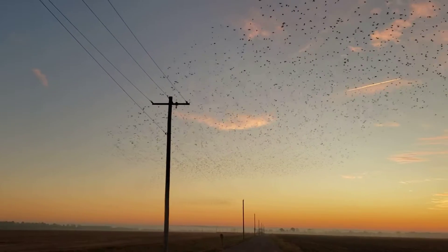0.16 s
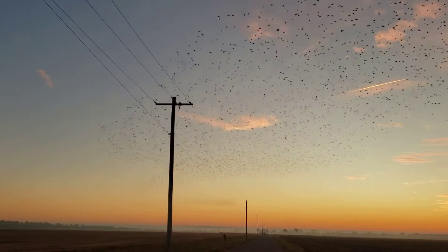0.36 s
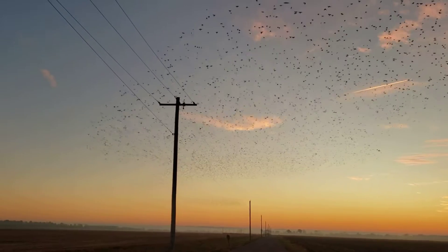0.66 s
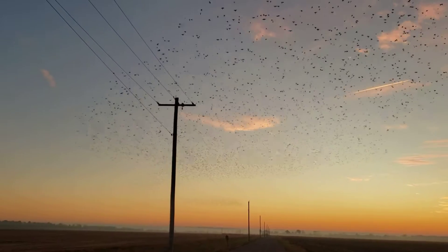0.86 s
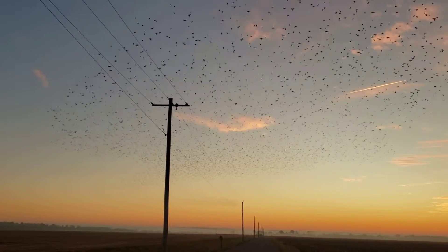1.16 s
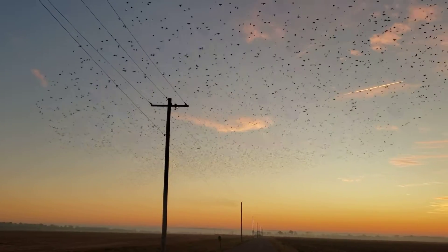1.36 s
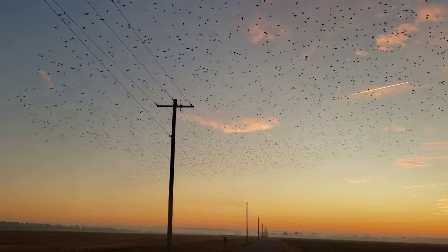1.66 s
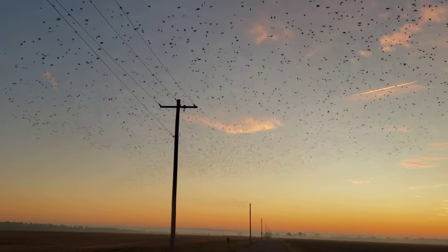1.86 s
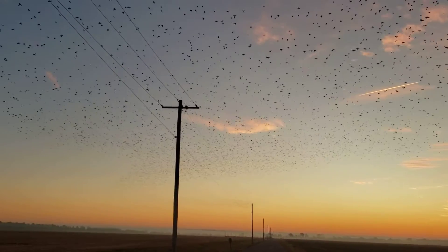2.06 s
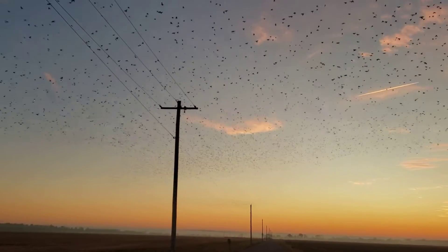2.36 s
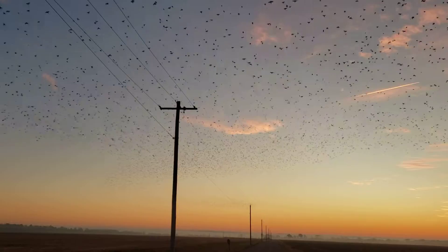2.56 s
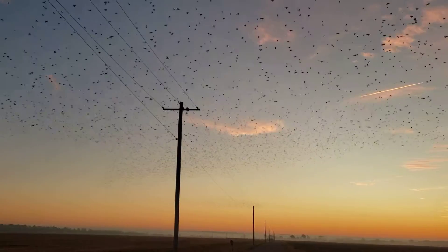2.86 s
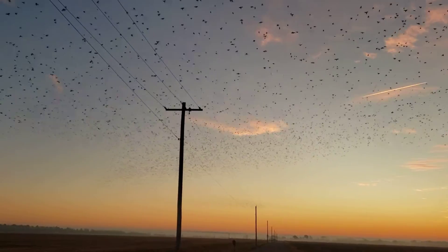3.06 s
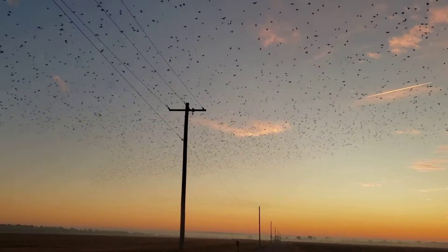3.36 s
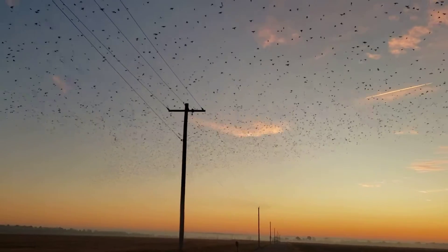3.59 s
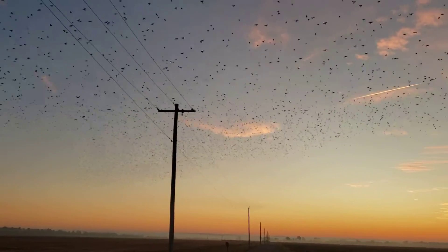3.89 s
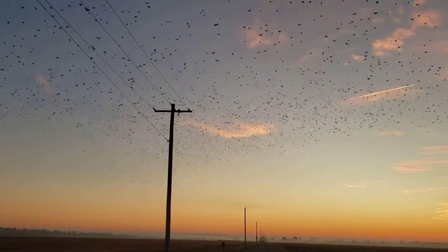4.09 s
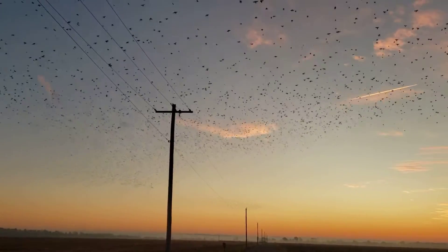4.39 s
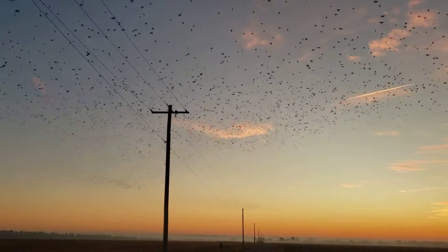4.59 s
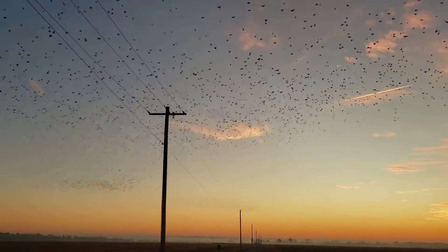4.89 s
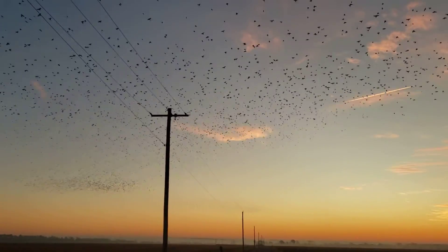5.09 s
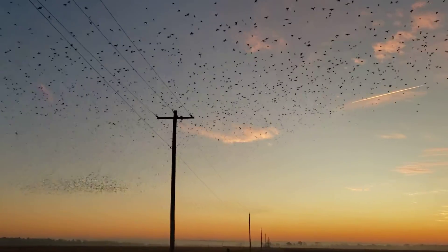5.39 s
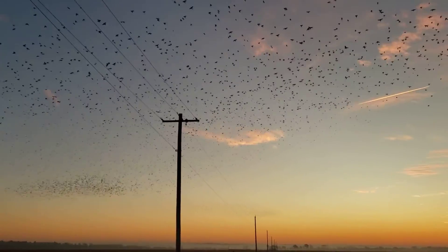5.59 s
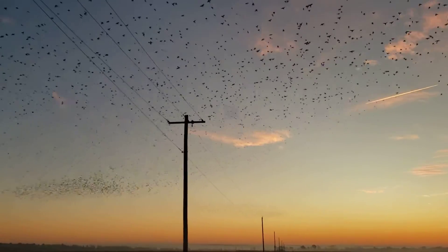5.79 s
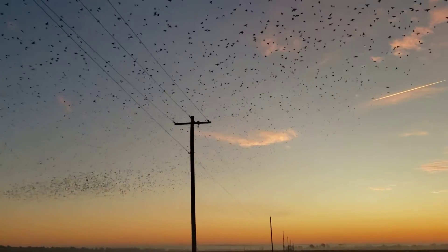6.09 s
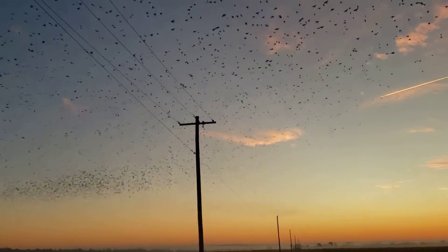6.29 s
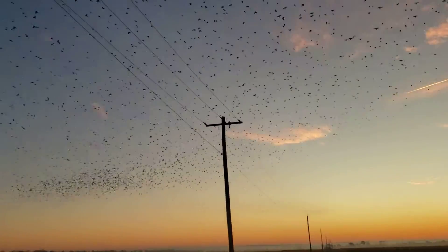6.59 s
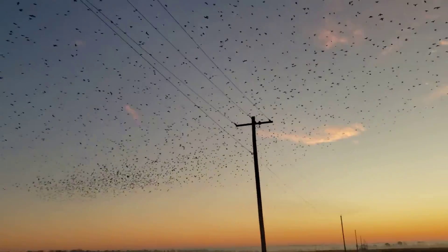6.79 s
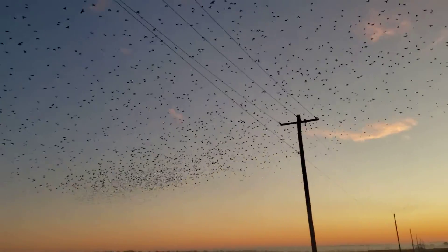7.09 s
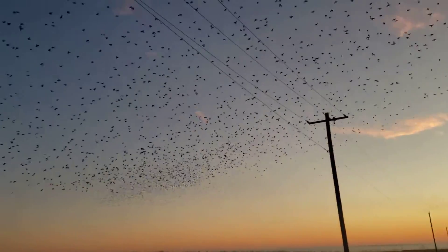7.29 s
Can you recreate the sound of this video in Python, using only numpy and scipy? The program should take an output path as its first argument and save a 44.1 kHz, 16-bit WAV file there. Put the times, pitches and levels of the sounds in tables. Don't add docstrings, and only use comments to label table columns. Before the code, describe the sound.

Dense airy rush of countless wings and flickering bird chatter, near rasps and squeaks poking through, above a very faint low hum and soft wind.

```python
import sys
import numpy as np
from scipy import signal
from scipy.fft import rfft, irfft, next_fast_len
from scipy.io import wavfile
from scipy.ndimage import uniform_filter1d, map_coordinates

SR = 44100
rng = np.random.default_rng(int(sys.argv[2]) if len(sys.argv) > 2 else 0)


def transcribe(signal):
    frames = np.atleast_2d(signal).T
    limited = np.clip(frames, -1, 1)
    pcm = np.round(limited * 32767).astype(np.int16)
    wavfile.write(sys.argv[1], SR, pcm)


def gain_from_db(level_db):
    decades = np.asarray(level_db, float) / 20
    return 10 ** decades


N = 328545

# time in seconds, density in dB, nearness in dB.
STREAM = [(0.0, -35.5, -1.1), (0.6, -35, -1.3), (1.25, -35, -1), (2.3, -35, -0.5), (2.6, -34.5, -0.4),
          (3.3, -35, 0.7), (3.95, -34, 0.5), (4.7, -34.9, 0.9), (5.1, -34.0, 0.2), (5.6, -35.4, 0.9),
          (6.33, -36.0, 0.8), (6.5, -38, -0.3), (6.65, -38.5, -1.0), (7.0, -39, -0.6), (7.45, -38.5, -0.4)]
# frequency in Hz, level in dB per Hz.
FACING_PORT = [(500, -19), (1000, -12), (1300, -6.5), (2000, -2), (2600, -2.5), (3200, 0.0), (3750, -1.5),
               (4300, -6), (5300, -10.5), (6600, -7), (7400, -17.5), (8500, -34), (11800, -26.5),
               (15600, -34.5)]
# frequency in Hz, level in dB per Hz.
SHADED_PORT = [(350.0, -16), (600.0, -6.5), (1000.0, -3.5), (1400.0, 1), (2400.0, -0.5), (3300.0, 0.5),
               (4200.0, -5), (5500.0, -15.5), (6300.0, -15), (7000.0, -20.5), (8800.0, -24.5),
               (11200.0, -17), (12600.0, -23), (14300.0, -38)]
GROUND_PAN_DB = 6


def unit(x):
    return x / np.sqrt(np.mean(x ** 2, axis=-1, keepdims=True) + 1e-20)


def along(points, hz):
    f, v = np.transpose(points)
    return np.interp(np.log(hz + 1), np.log(f + 1), v)


def curves(rows, t):
    s, *cols = np.transpose(rows)
    return [np.interp(t, s, c) for c in cols]


def wobble(rate):
    knots = rng.standard_normal(int(N * rate / SR) + 4)
    return map_coordinates(knots, [np.arange(N) * rate / SR])


def panned(x, db):
    return x * gain_from_db([[db / 2], [-db / 2]])


def paired(a, b, alike):
    turn = np.arccos(np.clip(alike, 0, 1)) / 2
    shared, apart = a * np.cos(turn), b * np.sin(turn)
    return np.array([shared + apart, shared - apart])


def air(spectrum, alike):
    m = next_fast_len(N)
    hz = np.fft.rfftfreq(m, 1 / SR)
    a, b = rfft(rng.standard_normal((2, m))) * gain_from_db(along(spectrum, hz))
    return unit(irfft(paired(a, b, along(alike, hz)), m)[:, :N])


def fields():
    # frequency in Hz, rms level in dB.
    orders = [(79.42, -52.5), (259, -76.5)]
    # frequency in Hz, level in dB per Hz.
    plain_colour = [(60, -14), (88, 2), (110, 0), (150, -1.5), (200, -7.5), (260, -6.5), (330, -11),
                    (500, -6), (700, -18.5), (1000, -39.5)]
    # time in seconds, level in dB.
    plain_level = [(0, -59), (1.1, -62), (1.9, -60.5), (2.6, -59), (2.85, -63), (3.65, -62), (4.2, -58),
                   (4.7, -61), (7.0, -62), (7.45, -59.5)]
    # frequency in Hz, level in dB per Hz.
    wind_colour = [(15, -30), (30, -13), (50, 2.5), (70, 3.5), (95, -30)]
    # peak time in seconds, build-up in seconds, lift in dB.
    gusts = [
        (.7, .4, 5),
        (2.45, 1.0, 9.5),
        (5.8, .2, 3),
        (7.2, .8, 5),
    ]
    calm_db, drop_s = -68.5, .25
    t = np.arange(N) / SR
    hum = 0
    for hz, db in orders:
        strength = gain_from_db(db + 3.5 + 0.57 * wobble(2.95))
        hum = hum + strength * np.sin(2 * np.pi * hz * t + .08 * wobble(4))
    rumble = gain_from_db(curves(plain_level, t)[0] + 2.5) * air(plain_colour, [(100, 0.99), (300, 0.73), (700, 0.87)])
    gust_db = sum(db * np.exp(-((t - s) / np.where(t < s, build, drop_s)) ** 2) for s, build, db in gusts)
    breeze = gain_from_db(calm_db + gust_db + 6.0 + 1.5 * wobble(5.2)) * air(wind_colour, [(30, .05), (70, .7)])
    return panned(hum + rumble + breeze, GROUND_PAN_DB)


def booms():
    # start in seconds, peak level in dB, pitch factor.
    blasts = [
        (4.0325, -45, 2.1),
        (4.186, -38.5, 1.07),
        (5.136, -35.5, 1.1),
        (6.549, -34, 1.05),
    ]
    out, t = np.zeros(N + SR), np.arange(round(.03 * SR)) / SR

    def swing(hz, fall, peak_s):
        swell = (t / peak_s * np.exp(1 - t / peak_s)) ** 1.4
        return np.sin(2 * np.pi * hz * t / (1 + fall * t)) * swell

    def place(s, pulse):
        out[round(s * SR):][:len(t)] += pulse

    for s, db, pitch in blasts:
        place(s, gain_from_db(db) * swing(192 * pitch, 19, .005 / pitch))
        place(s + .031, -gain_from_db(db - 1.0) * swing(510, 40, 0.0009))
        place(s + .0365, -gain_from_db(db - 12.5) * swing(146, 30, .004))
    return panned(out[:N], GROUND_PAN_DB)


def tick():
    click = (4.007, -43)
    start_s, peak_db = click
    out, t = np.zeros((2, N)), np.arange(200) / SR
    scrape = gain_from_db(peak_db - 60 * t / .003) * np.diff(rng.standard_normal(len(t) + 1))
    out[:, round(start_s * SR):][:, :len(t)] = scrape * gain_from_db([[-3], [0]])
    return out


def chirps(rows, rasp_db):
    out = np.zeros((2, N + SR))
    for s, length, start_hz, end_hz, db, pan_db in rows:
        u = np.linspace(0, 1, round((length + 0.0063) * SR))
        drift = np.cumsum(rng.standard_normal(len(u))) * .015 * start_hz / 4000
        hz = start_hz + (end_hz - start_hz) * u
        tone = np.sin(2 * np.pi * np.cumsum(hz) / SR + drift)
        flutter = np.interp(u * length, np.arange(40) * .006, rng.standard_normal(40))
        shape = np.abs(np.sin(np.pi * u)) ** 0.67 * gain_from_db(rasp_db * flutter)
        call = gain_from_db(db + 3.5) * shape * tone * gain_from_db([[0], [-pan_db]])
        out[:, round(max(s - .003, 0) * SR):][:, :len(u)] += call
    return out[:, :N]


def chatter(count=960):
    when, long, pitch, glide, size, side = rng.random((count, 6)).T
    gang_time, gang_pitch = rng.random((count // 8, 2)).repeat(8, axis=0).T
    s = np.clip(gang_time * N / SR + .45 * (when - .5), 0, N / SR)
    hz = 2500 * 2 ** (1.3 * gang_pitch ** 1.2 + .45 * pitch)
    db = curves(STREAM, s)[0] - 1.8 + along(FACING_PORT, hz) - 9 * size
    pan_db = along(FACING_PORT, hz) - along(SHADED_PORT, hz) + 12 + 9 * side
    return chirps(zip(s, .01 + .03 * long, hz, hz * (.97 + .07 * glide), db, pan_db), rasp_db=3.0)


def chacks(length=.05, width_hz=1100):
    # middle of the call in seconds, level in dB, throat resonance in Hz.
    harsh_calls = [(0.14, -29.0, 3390.0), (0.287, -28, 3220.0), (0.573, -28, 3370.0), (.72, -31, 3300),
                   (0.84, -27, 3400.0), (.99, -32, 3200), (1.244, -29, 3100), (1.466, -33, 3260.0),
                   (1.798, -28, 2840), (1.89, -32, 3350), (2.602, -31, 3150.0), (2.844, -29, 3380.0),
                   (3.092, -29, 3590.0), (3.934, -28, 3150.0), (4.33, -31, 3730), (4.41, -31, 3190.0),
                   (4.86, -32, 3200), (5.07, -29, 3200), (5.561, -31, 3220.0), (6.27, -30, 3130.0),
                   (6.392, -36, 3850.0), (6.8, -29, 3300), (6.92, -35, 3400), (7.13, -32, 3200),
                   (7.306, -34.0, 3200)]
    out, u = np.zeros(N + SR), np.linspace(0, 1, round(length * SR))
    for s, db, hz in harsh_calls:
        b, a = signal.butter(2, [hz - width_hz / 2, hz + width_hz / 2], "band", fs=SR)
        rasp = unit(signal.lfilter(b, a, rng.standard_normal(len(u))))
        out[round((s - length / 2) * SR):][:len(u)] += gain_from_db(db - 0.9) * np.sin(np.pi * u) ** 2 * rasp
    return out[:N] * gain_from_db([[0], [-19]])


def whistles():
    # start in seconds, length in seconds, start pitch in Hz, glide in percent, level in dB.
    clear_calls = [(.543, .04, 4090, -1, -40), (.711, .017, 4020, 0, -39), (1.128, .026, 6800, 3, -44),
                   (1.273, .058, 5030, -3, -38), (1.495, 0.029, 4640, 2, -39),
                   (1.985, .025, 4400, 1.5, -37), (2.701, .018, 4830, 3.5, -33),
                   (2.733, .014, 5030, 3, -34), (3.0, 0.028, 7000, 2, -41.5), (3.061, 0.033, 3930, 3, -34),
                   (3.558, .019, 4350, 1.5, -34), (3.675, .039, 6590, 0, -38), (4.326, .038, 4350, -4, -34),
                   (5.254, 0.057, 4600, -1, -39), (5.486, .035, 5690, -1.5, -39),
                   (5.902, 0.033, 5880, 1.5, -40.5), (5.935, 0.084, 6420, 3.5, -42),
                   (6.105, .035, 4610, -2, -37), (6.255, 0.021, 3190, -1.5, -32.5),
                   (6.377, 0.054, 4010, 3, -31.5), (6.767, 0.055, 4360, -2.5, -38),
                   (6.909, .023, 3830, -1, -36), (7.002, 0.064, 6260, 1.5, -41),
                   (7.105, .032, 3450, -10, -37)]
    # start in seconds, length in seconds, start pitch in Hz, level in dB.
    thin_tones = [(0.794, .025, 7390, -49), (1.473, .068, 12270, -58), (1.52, .044, 7260, -51),
                  (1.816, .07, 12000, -59), (2.514, .06, 7500, -48), (2.524, .106, 11300, -59),
                  (2.828, .044, 9900, -58), (2.956, .058, 10200, -52), (2.953, 0.16, 11400, -55),
                  (3.035, .065, 7450, -52), (5.67, 0.039, 7280, -45), (5.87, .05, 12300, -54),
                  (6.893, 0.074, 6760, -41), (7.397, .047, 7540, -52)]

    def shade(hz):
        return along(FACING_PORT, hz) - along(SHADED_PORT, hz) + 19

    rows = []
    for s, long, hz, glide, db in clear_calls:
        end_hz = hz * (1 + glide / 100)
        rows.append((s, long, hz, end_hz, db, shade(hz)))
        if hz < 15790 / 3:
            rows.append((s, long, 3 * hz, 3 * end_hz, db - 27, shade(3 * hz)))
    for s, long, hz, db in thin_tones:
        rows.append((s, long, hz, hz * 1.038, db - 1, shade(hz)))
    return chirps(rows, rasp_db=2.5)


def strokes(hz, t, count, beat_hz, stroke_s, centre_hz, octaves, scatter_db):
    start, pace, pitch, size, stay = rng.random((count, 5)).T[:, :, None]
    age = t - (start * (N / SR + 1) - .5)
    passing = np.exp(-(age / (0.089 + 0.4 * stay)) ** 2)
    phase = (age * beat_hz * (0.775 + .4 * pace)) % 1 - .5
    loudness = gain_from_db(-scatter_db * np.log(1 - .98 * size))
    puffs = passing * np.exp(-(phase / (beat_hz * stroke_s)) ** 2) * loudness
    centre = centre_hz * 2 ** (3.4 * (pitch - .5))
    colour = np.exp(-(np.log2((hz + 1) / centre) / octaves) ** 2)
    power = colour.T @ puffs
    return power / (uniform_filter1d(power, size=90, axis=1) + .05 * power.mean())


def flock():
    # frequency in Hz, likeness from 0 to 1.
    likeness = [(60, 1), (180, 0.81), (550, 0.74), (1650, 0.067), (4970, 0.01), (15000, 0.02)]
    # time in seconds, left over right in dB.
    sky_drift = [(0.0, 14.5), (2.8, 15.5), (5, 15.5), (7.45, 14.5)]
    # time in seconds, lift of the feather fizz in dB.
    low_birds = [(0.31, 2.6), (0.58, 4.5), (0.84, 2.5), (1.06, 1.5), (1.49, 2.5), (1.69, 2), (1.84, 2.5),
                 (2.0, 0.7), (2.14, 4.5), (2.42, 2), (2.56, 6.5), (2.69, 1.5), (2.84, 3.7), (3.01, 7),
                 (3.59, 2.5), (3.88, 3), (4.34, 1.6), (4.53, 1.9), (5.16, 1.5), (5.9, 3.5), (6.29, 2.5),
                 (6.77, 6.5), (6.98, 4.8), (7.3, 2)]
    # frequency in Hz, lift in dB per dB.
    near_lifts = [(1200, -0.75), (3500, .3), (6200, 1.4), (11000, 0.9)]
    # frequency in Hz, share of the sweep's lift.
    sweep_lifts = [(1200, .08), (2100, .22), (3500, 0.17), (6200, 0.52), (10000, 0.9)]
    half_sweep_s, surge_db, surges_per_s = .048, 0.4, 18

    def swell(db):
        return db - np.mean(db)

    hz, t, z = signal.stft(rng.standard_normal((2, N)), SR, nperseg=512)
    rush_db, near_db = curves(STREAM, t)
    near = np.clip(along([(700, 0.027), (3000, .2), (7000, .33), (12000, .56)], hz), 0, 1)[:, None]
    puffs = strokes(hz, t, count=260, beat_hz=11.1, stroke_s=0.031, centre_hz=4500, octaves=0.17, scatter_db=9.0)
    ports = gain_from_db([along(FACING_PORT, hz), along(SHADED_PORT, hz) - 16.5])
    ports = ports / (1 + (450 / (hz + 1)) ** 4)
    wings = paired(*z, along(likeness, hz)[:, None])
    wings = wings * np.sqrt(1 - near + near * puffs) * ports[:, :, None]

    sweeps_db = sum(db * np.exp(-((t - s) / half_sweep_s) ** 2) for s, db in low_birds)
    heave_db = surge_db * np.interp(t, np.arange(N) / SR, wobble(surges_per_s))
    brighter_db = np.outer(along(near_lifts, hz), swell(near_db))
    brighter_db += np.outer(along(sweep_lifts, hz), swell(sweeps_db))
    wings = wings * gain_from_db(brighter_db + swell(rush_db) + heave_db)
    wings[1] *= gain_from_db(-swell(curves(sky_drift, t)[0]))
    rush = signal.istft(wings, SR, nperseg=512)[1][:, :N]
    return rush / np.std(rush[0]) * gain_from_db(-27.5)


def scene():
    return fields() + booms() + tick() + chacks() + chatter() + whistles() + flock()


def top_cut(x):
    return signal.sosfilt(signal.butter(12, 15980, fs=SR, output="sos"), x)


def record(dry):
    return top_cut(dry)


dry = scene()
out = record(dry)
transcribe(out)
```